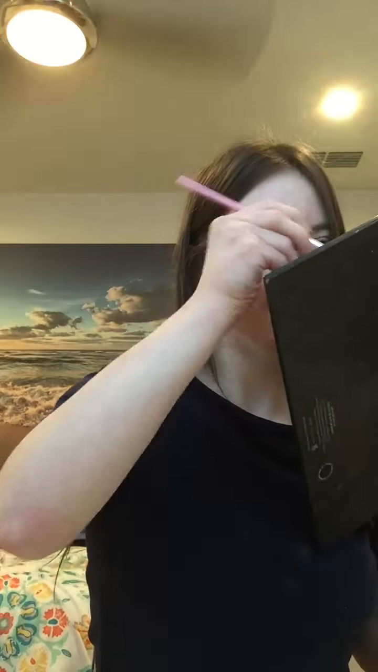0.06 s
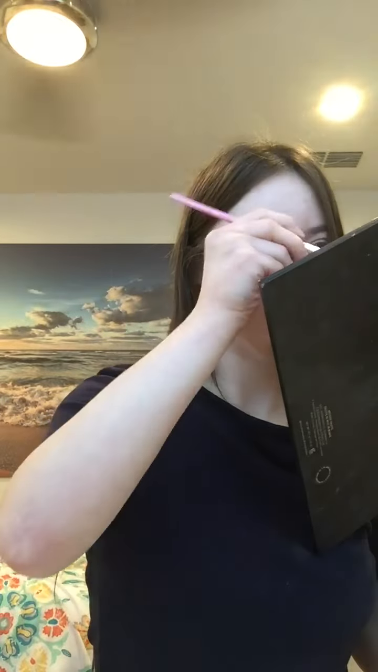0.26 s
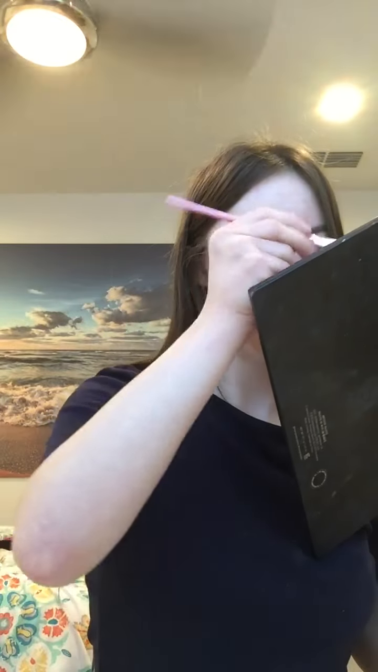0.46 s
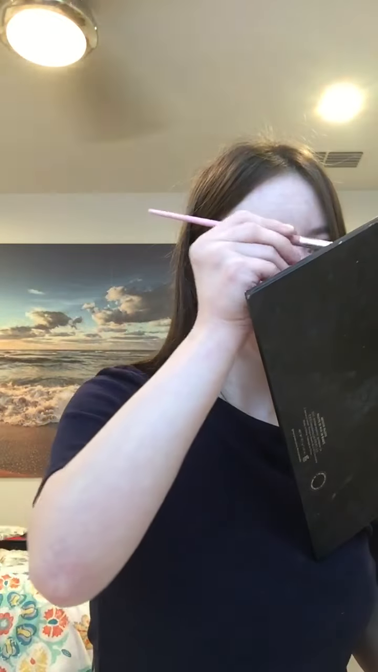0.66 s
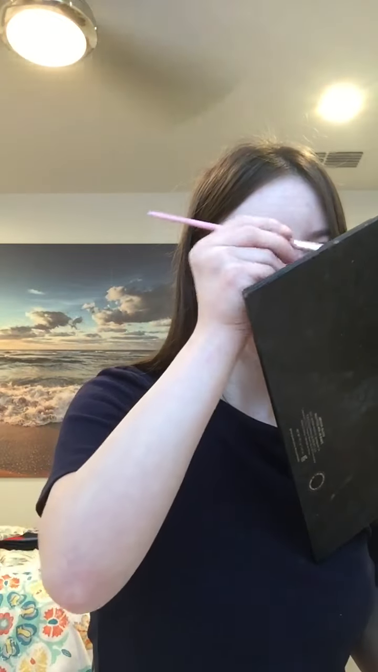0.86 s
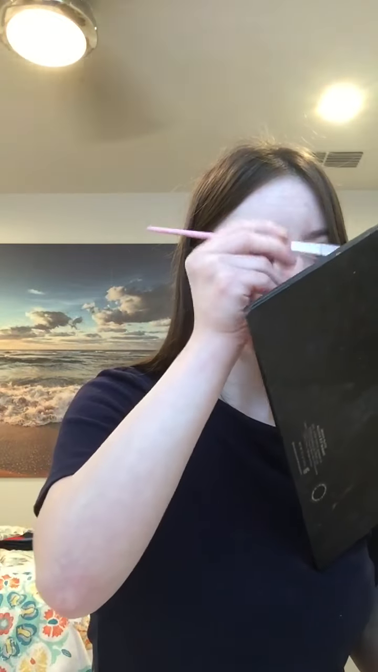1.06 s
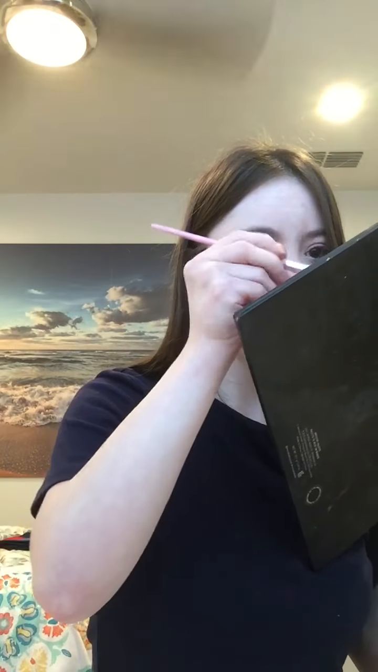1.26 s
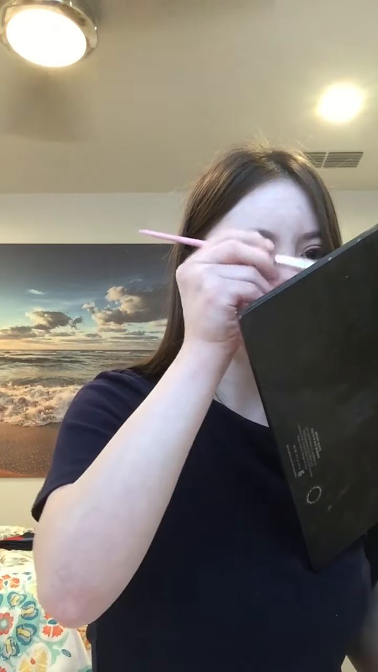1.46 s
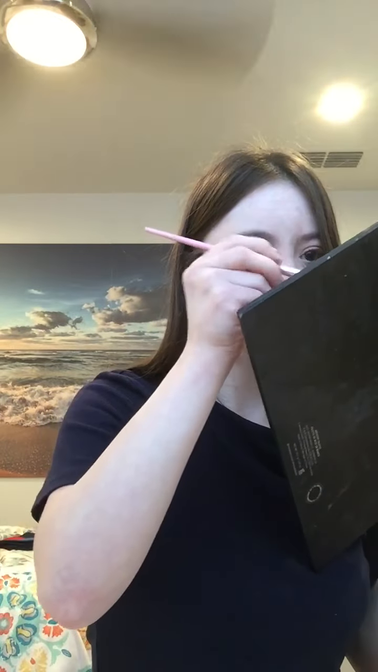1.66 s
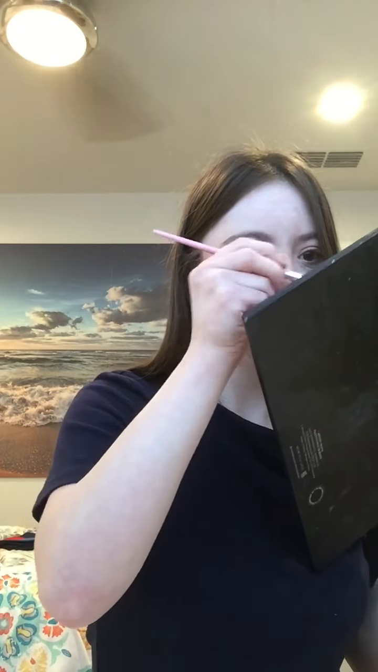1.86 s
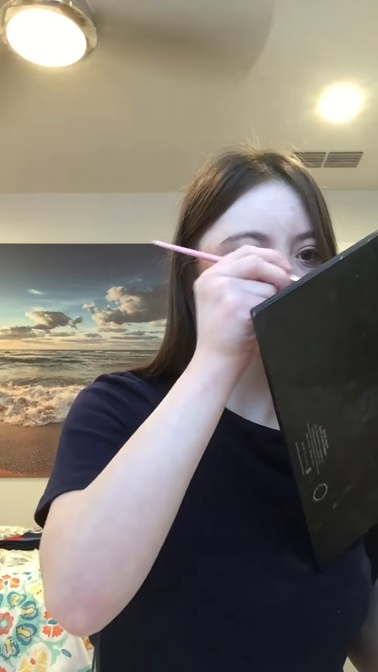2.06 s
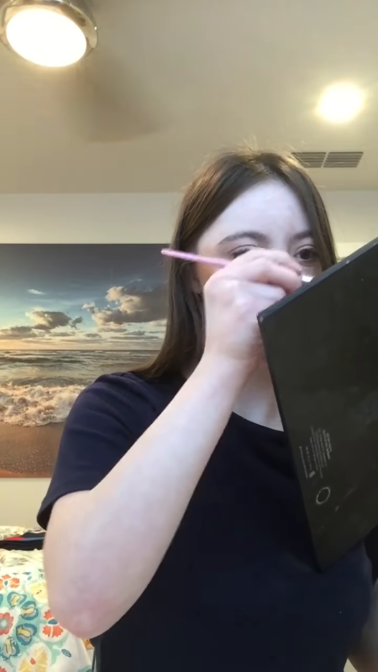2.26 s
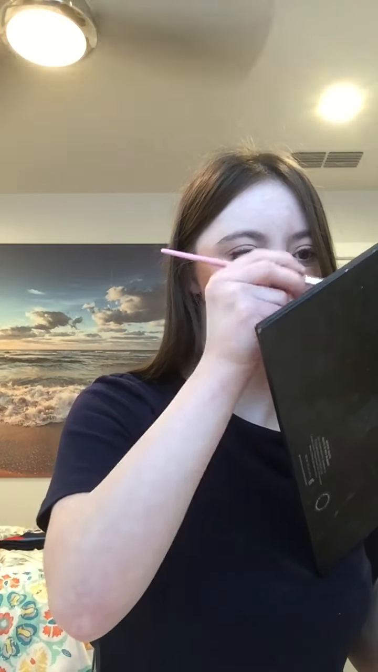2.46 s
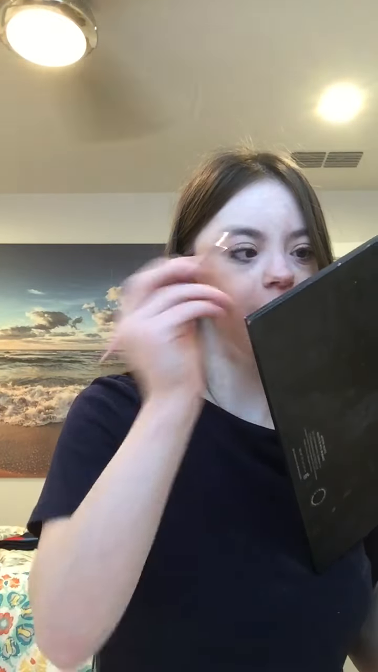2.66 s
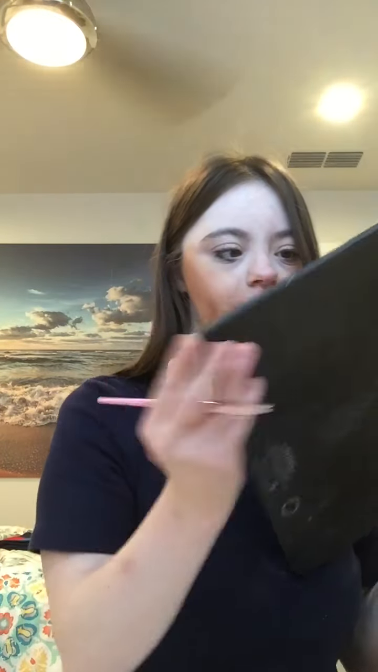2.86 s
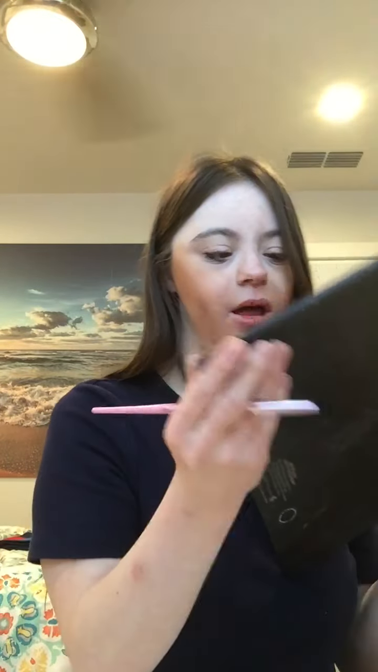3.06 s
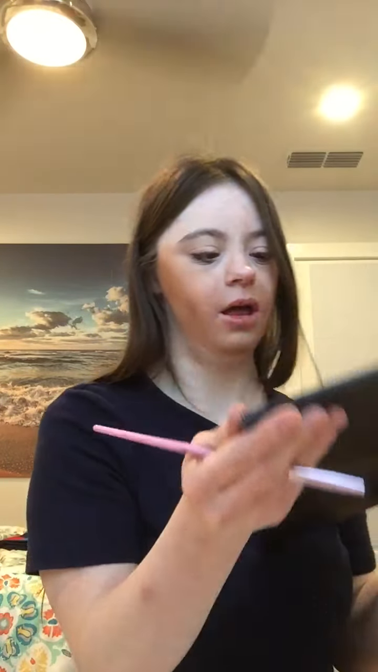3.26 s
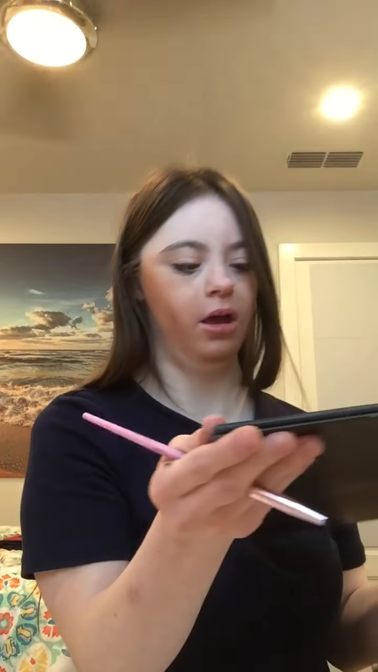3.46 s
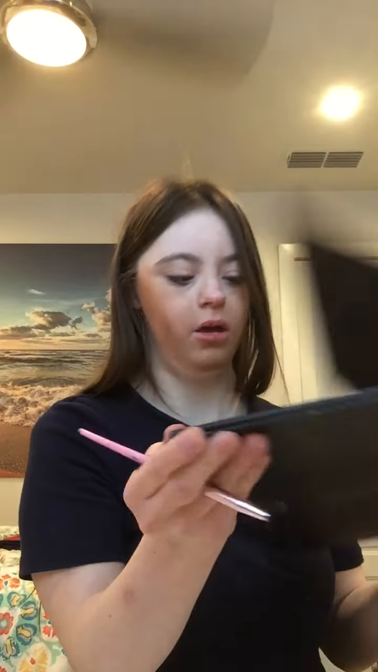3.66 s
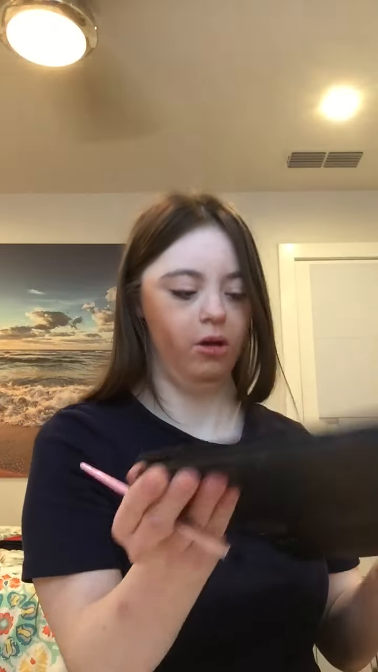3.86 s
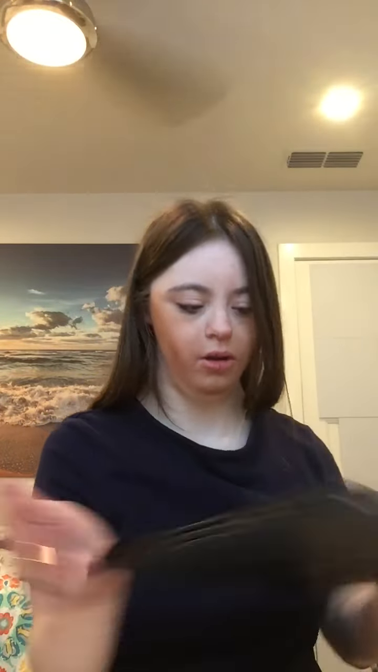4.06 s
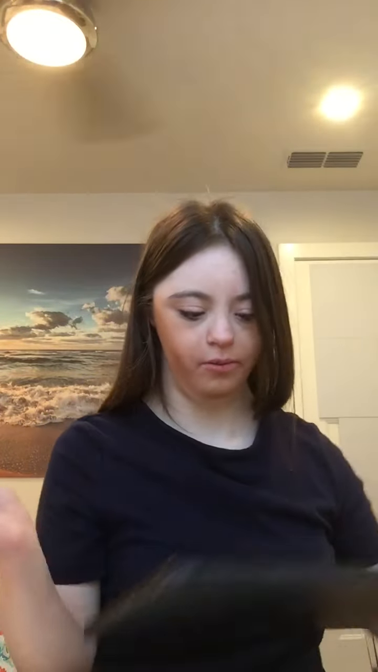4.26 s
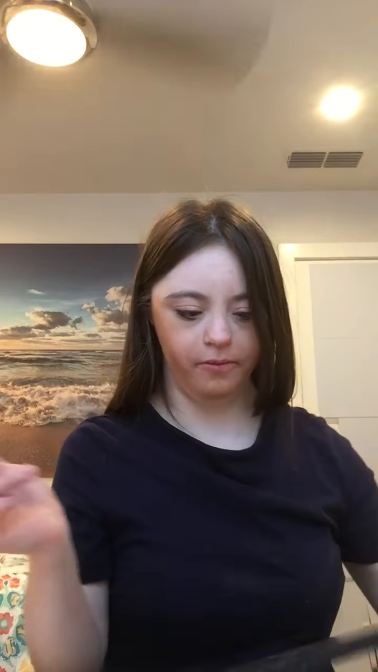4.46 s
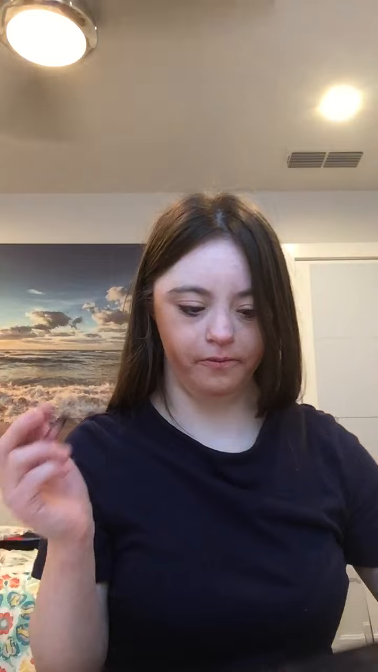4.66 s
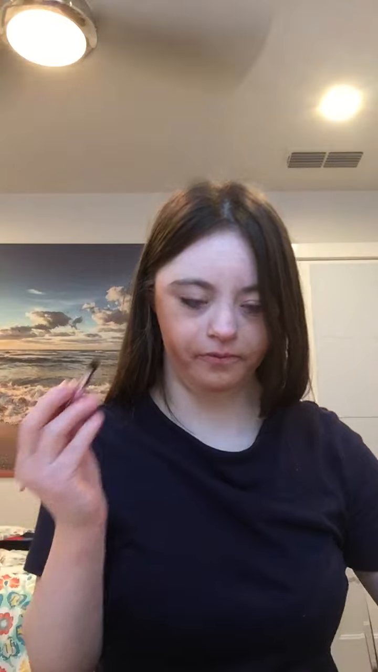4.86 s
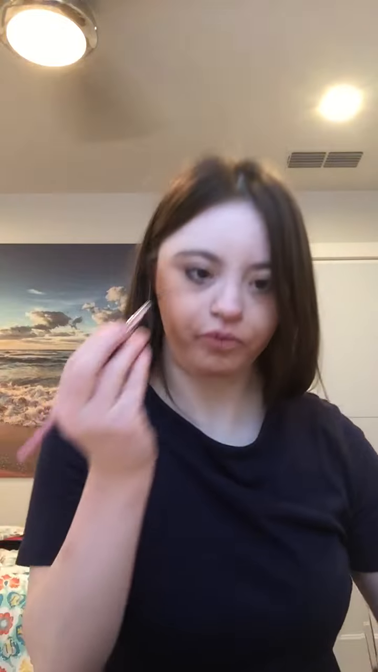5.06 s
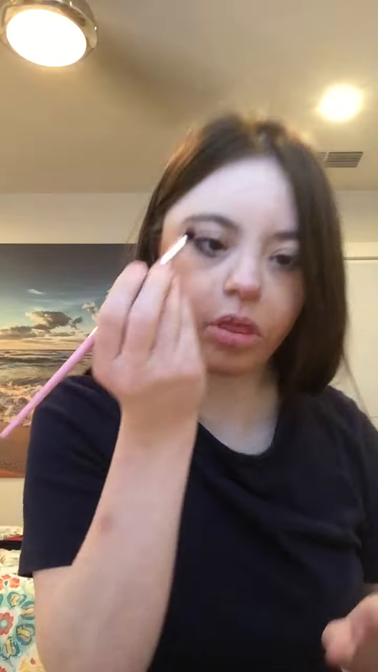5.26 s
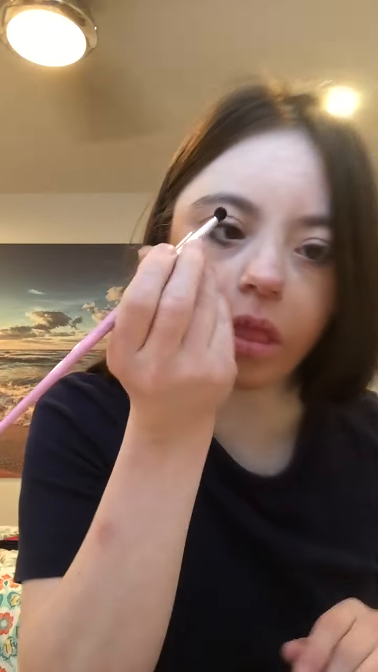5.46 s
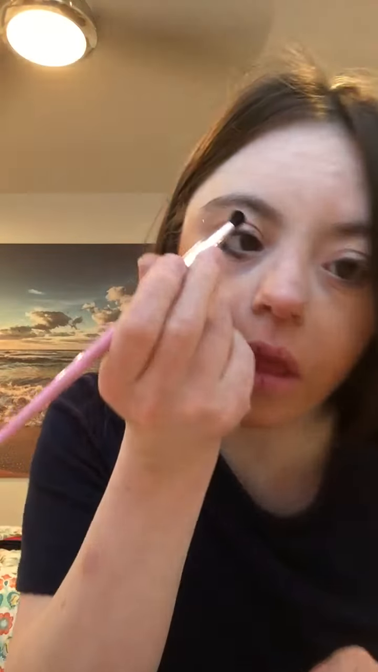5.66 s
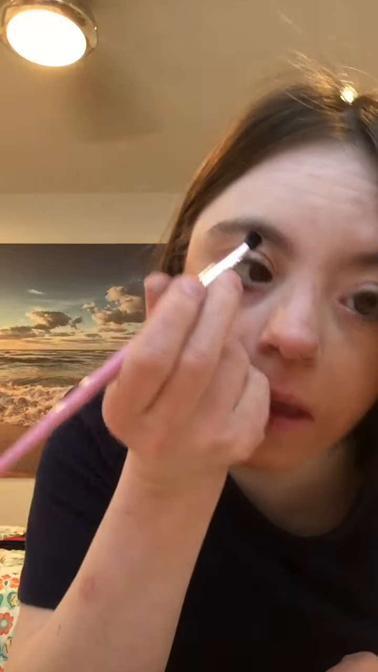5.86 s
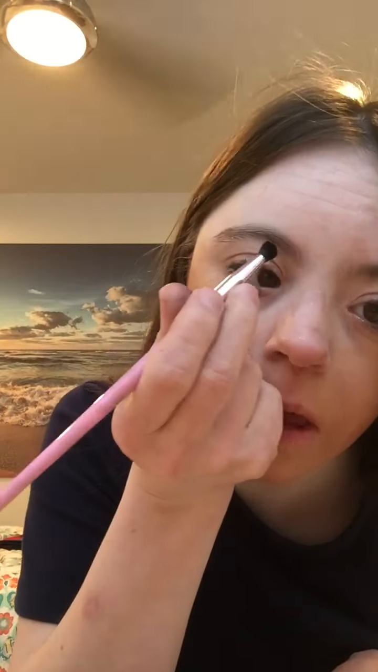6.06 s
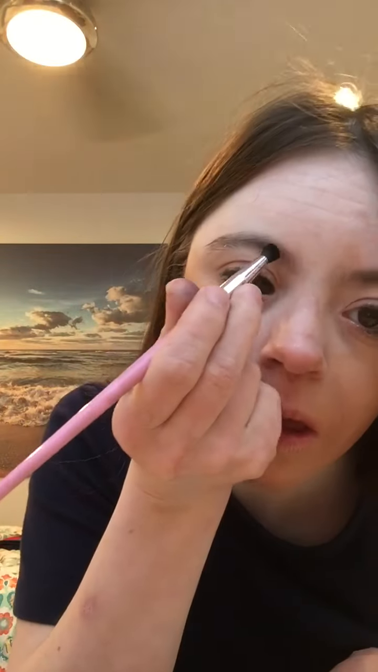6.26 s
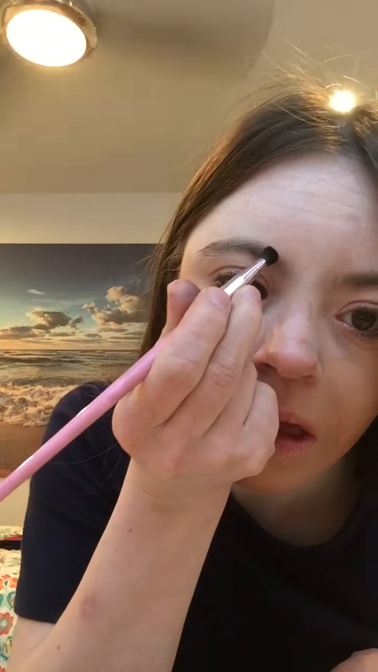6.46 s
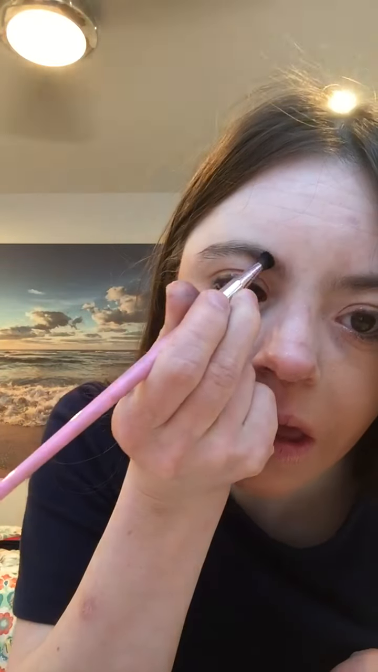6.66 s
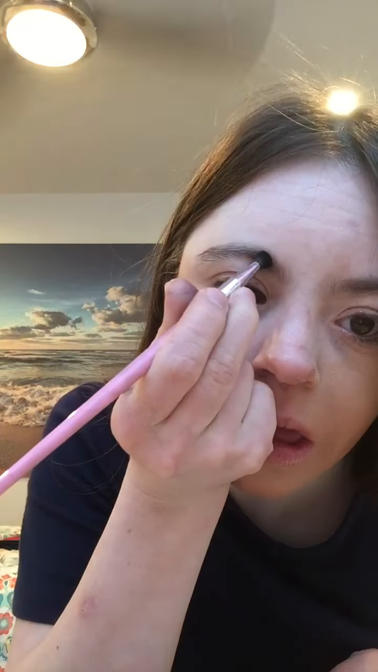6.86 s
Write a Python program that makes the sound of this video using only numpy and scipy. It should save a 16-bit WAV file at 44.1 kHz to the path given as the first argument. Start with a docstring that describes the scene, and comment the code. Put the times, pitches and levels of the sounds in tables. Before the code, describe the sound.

Over a ceiling fan's hum, hands shut a card palette with two clacks, thump it on a table, then a small click follows.

```python
"""A large card makeup palette is clacked shut and put down on a table that carries the microphone.
The lid clacks twice, with a crunch of card and a bright snap; the table thumps under each knock.
Hands slide, fingers and a brush handle tick, and a small hollow click rebounds near the end.
A small bedroom answers, over the mains hum and soft air noise of a ceiling fan."""
import sys
import numpy as np
from scipy import signal
from scipy.fft import rfft, irfft
from scipy.io import wavfile
from scipy.ndimage import uniform_filter1d

SR = 44100
rng = np.random.default_rng(int(sys.argv[2]) if len(sys.argv) > 2 else 0)


def master_out(mix):
    """Clip the mix to full scale and print it as 16-bit PCM to the path in sys.argv[1]."""
    frames = np.transpose(np.atleast_2d(mix))
    ceiling = np.clip(frames, -1, 1)
    pcm = np.round(ceiling * 32767).astype(np.int16)
    wavfile.write(sys.argv[1], SR, pcm)


N = 304376
T = np.arange(N) / SR


def undb(db):
    """Decibels to gain."""
    return 10 ** (np.asarray(db) / 20)


def unit_rms(x):
    """Scale to rms 1."""
    return x / np.sqrt(np.mean(x ** 2))


def curve_at(points, hz):
    """Read (Hz, value) points on a log-frequency axis."""
    points_hz, values = np.transpose(points)
    return np.interp(np.log(np.maximum(hz, 1)), np.log(points_hz), values)


def colour(x, spectrum, size=8192):
    """Minimum-phase filter with a (Hz, dB) spectrum."""
    gain = undb(curve_at(spectrum, np.fft.rfftfreq(size, 1 / SR)))
    cepstrum = irfft(np.log(gain))
    cepstrum[1:size // 2] *= 2
    cepstrum[size // 2 + 1:] = 0
    return signal.fftconvolve(x, irfft(np.exp(rfft(cepstrum))))[:len(x)]


def butter(x, hz, kind, order=2):
    """Butterworth filter."""
    sos = signal.butter(order, np.minimum(hz, SR / 2 - 100), kind, fs=SR, output="sos")
    return signal.sosfilt(sos, x)


def decay(t60_s):
    """A quarter second of exponential decay."""
    return np.exp(-np.log(1000) * T[:SR // 4] / t60_s)


def ring(hz, t60_s):
    """One struck mode."""
    return np.sin(2 * np.pi * hz * T[:SR // 4]) * decay(t60_s)


def burst(t60_s):
    """Dying noise of unit energy and even spectrum, like a dense cluster of tiny impacts."""
    envelope = decay(t60_s)
    x = rng.standard_normal(len(envelope)) * envelope
    for _ in range(4):
        whitened = irfft(np.exp(1j * np.angle(rfft(x))), len(envelope))
        x = whitened * envelope ** 0.25
    return x / np.linalg.norm(x)


def resonance(hz, t60_s, edge_ratio):
    """A dying burst in a narrow band around hz."""
    return butter(burst(t60_s), [hz / edge_ratio, hz * edge_ratio], "band")


def wander(rate_hz):
    """Smooth random curve of rms 1."""
    hold = int(SR / rate_hz)
    steps = np.repeat(rng.standard_normal(N // hold + 1), hold)
    return unit_rms(uniform_filter1d(steps, hold)[:N])


def mottle(x, depth_db):
    """Each narrow band swells and fades on its own over tens of milliseconds."""
    cells = signal.stft(x, SR, nperseg=256)[2]
    patches = uniform_filter1d(rng.standard_normal(cells.shape), size=9, axis=1)
    patches = uniform_filter1d(patches, size=3, axis=0)
    gain = unit_rms(undb(depth_db * unit_rms(patches)))
    return signal.istft(cells * gain, SR)[1][:len(x)]


def add(track, start_s, x):
    """Mix x into the track at start_s."""
    i = int(start_s * SR)
    track[i:i + len(x)] += x[:N - i]


# Reflection spectrum. Each row: frequency in Hz, gain in dB.
ROOM_SPECTRUM = [(60, -8.5), (140, -11.5), (300, 1.5), (700, 2), (1600, -4), (4000, 0), (7000, -3),
                 (15000, -5)]
# Room decay. Each row: frequency in Hz, t60 in seconds.
ROOM_DECAY = [(100, 0.47), (500, 0.22), (1500, 0.26), (4000, 0.19), (12000, 0.18)]

def in_room(x, wet_db, gap_s=0.0015, build_s=0.011):
    """Direct sound plus dense small-room reflections, new for each call; the treble dies first."""
    t = T[:SR // 2]
    hz, age_s, cells = signal.stft(rng.standard_normal(len(t)), SR, nperseg=256)
    decay_db = -60 * age_s / curve_at(ROOM_DECAY, hz)[:, None]
    tail = signal.istft(cells * undb(decay_db), SR)[1][:len(t)]
    tail *= np.clip((t - gap_s) / build_s, 0, 1)
    response = undb(wet_db) * colour(tail / np.linalg.norm(tail), ROOM_SPECTRUM)
    response[0] += 1
    return signal.fftconvolve(x, response)[:N]


# Motor hum. Each row: harmonic number, rms level in dB.
HUM_HARMONICS = [(1, -48.5), (2, -59.5), (3, -60)]
# Fan air and microphone hiss. Each row: frequency in Hz, relative level in dB.
AIR_SPECTRUM = [(20, -23), (45, -10.5), (82, -0.5), (105, -4), (210, 0), (270, -5.5), (370, -3),
                (420, -15.5), (510, -20), (1000, -26), (2200, -31), (5000, -36.5), (11000, -42),
                (15500, -41.5)]

def fan(hum_hz=120, waver_db=0.965, air_db=-54.5):
    """The motor hums at twice the mains rate, its overtones wavering more; the air noise is steady."""
    hum = np.zeros(N)
    for harmonic, db in HUM_HARMONICS:
        amplitude = np.sqrt(2) * undb(db + waver_db * harmonic * wander(7.3))
        hum += amplitude * np.sin(2 * np.pi * (harmonic * hum_hz * T + rng.random()))
    air = unit_rms(colour(rng.standard_normal(N), AIR_SPECTRUM))
    return hum + undb(air_db) * air


# Rub before its tilt, and skin hiss. Each row: frequency in Hz, relative level in dB.
RUB_SPECTRUM = [(400, -8), (750, 7.5), (1400, 2.5), (2400, -3.5), (3500, -1.5), (5000, 0), (7000, -10.5),
                (10000, -17)]
HISS_SPECTRUM = [(3000, -3), (6000, -14), (8500, 1.5), (10500, 0), (13500, 5.5), (15500, -1), (16500, -12)]
# Hands and palette slide on card, cloth and table.
# Each row: peak time in seconds, fade time in seconds, level in dB, pressure from 0 to 1.
SLIDE_STROKES = [(1.05, 0.2, -78, 0.3), (2.074, .025, -65, 0.5), (2.79, 0.042, -60.5, 0.34),
                 (2.901, 0.15, -66.5, 0.25), (3.008, .025, -60, 0), (3.095, 0.088, -63.5, .24),
                 (3.328, 0.013, -69, 0), (3.394, 0.061, -69, 0.24), (3.681, 0.16, -61, 0.1),
                 (3.919, 0.12, -62, 0.28), (4.057, 0.042, -64, 0.03), (4.145, 0.053, -63, 0.17),
                 (4.48, 0.27, -70.5, 0.3), (4.699, 0.048, -57.5, 1), (4.787, 0.14, -63.5, 0.8),
                 (4.997, 0.052, -60.5, .6), (5.557, 0.057, -65, 0.91), (6.179, 0.098, -69.5, 0.63)]

def slides(grain_db=1.0, catch_db=0.56, rise_ratio=0.71):
    """Skin drags in tiny uneven slips; pressure trades hiss for rub and darkens the rub."""
    slips = undb(grain_db * wander(450) + catch_db * wander(35))
    from_peak_s = T[:int(SR * 0.8)] - 0.4
    out = np.zeros(N)
    for peak_s, fade_s, db, pressure in SLIDE_STROKES:
        width_s = fade_s * np.where(from_peak_s < 0, rise_ratio, 1)
        swell = np.exp(-(from_peak_s / width_s) ** 2)
        tilt_db_per_octave = 7 - 10 * pressure
        tilted = [(hz, rub_db + tilt_db_per_octave * np.log2(hz)) for hz, rub_db in RUB_SPECTRUM]
        rub = unit_rms(colour(rng.standard_normal(len(swell)), tilted))
        hiss = unit_rms(colour(rng.standard_normal(len(swell)), HISS_SPECTRUM))
        balance = undb(-4 + 14 * pressure)
        add(out, peak_s + from_peak_s[0], undb(db) * swell * (rub * balance + hiss / balance))
    return mottle(out * unit_rms(slips), depth_db=3)


# Contact snap, shared by taps, clicks, knocks and lid. Each row: frequency in Hz, gain in dB.
SNAP_SPECTRUM = [(300, -53), (1200, 15), (4000, -2.5), (5200, -5), (9000, -6), (13500, -5), (16000, -7)]

def tap(hz, t60_s, snap_db):
    """A light touch rings two bending modes of a thin stiff part; a longer one starts softly."""
    fundamental = resonance(hz, t60_s, edge_ratio=1.12)
    overtone = resonance(min(3.3 * hz, 14000), t60_s, edge_ratio=1.12)
    snap = colour(burst(t60_s), SNAP_SPECTRUM)
    onset = np.minimum(T[:SR // 4] / (0.12 * t60_s), 1)
    return onset * (19 * fundamental + 0.7 * overtone + undb(snap_db) * snap)


# Light touches. Each row: start in seconds, level in dB, centre in Hz, t60 in seconds.
TOUCHES = [(2.054, -41, 3480, 0.039), (2.123, -54, 4070, 0.027), (2.774, -41.5, 3580, 0.065),
           (2.939, -39.5, 1390, 0.017), (2.945, -35, 630, .06), (3.084, -36, 2030, 0.063),
           (4.065, -46.5, 3080, 0.018), (4.662, -22, 4960, 0.026), (4.913, -40.5, 2570, 0.018),
           (5.37, -44, 1454, 0.019), (5.646, -50.5, 8300, 0.02), (5.984, -49.5, 7300, 0.03)]

def ticks():
    """Single taps and scuffs of fingers and brush handle."""
    out = np.zeros(N)
    for start_s, db, hz, t60_s in TOUCHES:
        add(out, start_s, undb(db) * tap(hz, t60_s, snap_db=6))
    return out


def grip(start_s=3.014, length_s=0.17, slips_per_s=27, jitter_s=0.0024, scatter_db=2, fade_db_per_s=20):
    """Fingers shift their grip, sticking and slipping on the lid in a short uneven run."""
    out = np.zeros(N)
    for age_s in np.arange(0, length_s, 1 / slips_per_s):
        slip_s = start_s + age_s + rng.normal(0, jitter_s)
        db = rng.normal(-36, scatter_db) - fade_db_per_s * age_s
        add(out, slip_s, undb(db) * tap(hz=2130, t60_s=0.072, snap_db=0))
    return out


# A click and its rebound. Each row: start in seconds, level in dB.
CLICK_HITS = [(6.2272, 0.5), (6.2490, -5)]
# Cavity modes. Each row: centre in Hz, level in dB, t60 in seconds, ratio of band edge to centre.
HOLLOW_MODES = [(1510, -2, 0.022, 1.094), (1920, -6, 0.37, 1.035), (3960, -10.5, .06, 1.08),
                (6350, -20.5, 0.034, 1.06)]

def clicks(snap_db=-25):
    """A sharp snap rings a small hollow; one resonance lingers."""
    out = np.zeros(N)
    for start_s, db in CLICK_HITS:
        hollow = sum(undb(mode_db) * resonance(hz, t60_s, edge_ratio)
                     for hz, mode_db, t60_s, edge_ratio in HOLLOW_MODES)
        snap = colour(burst(0.025), SNAP_SPECTRUM)
        add(out, start_s, undb(db) * (hollow + undb(snap_db) * snap))
    return out


# Palette modes. Each row: frequency in Hz, relative level in dB, t60 in seconds before damping.
PALETTE_MODES = [(240, -9, .04), (382, -7, .035), (580, -1, .03), (705, -2, .035), (1032, -4, .03),
                 (1232, -4, .035), (1375, -1, .045), (1560, -5, .03), (1710, -5, .035), (1950, -1, .035),
                 (2432, -7, .035), (3075, -5, .03), (3322, -4, .03), (3785, -6, .03), (4040, -6, .035),
                 (4420, -6, .025), (6350, -17, .02)]
# Card on card. Each row: frequency in Hz, gain in dB.
CRUNCH_SPECTRUM = [(70, -23), (200, 7.5), (420, 5), (620, 6.5), (870, 2.5), (1400, 1.5), (2000, 2.5),
                   (2600, -4.5), (3400, 2), (4400, 1), (5600, -7.5), (7500, -4), (14000, 9)]

def palette_blow(cutoff_hz, pitch_ratio=1.0, damping=0.66, modes_db=-26, crunch_db=4):
    """A blow rings the palette and crunches the card; a soft contact loses the treble."""
    modes = sum((-1) ** k * undb(db) * ring(hz * pitch_ratio, t60_s * damping)
                for k, (hz, db, t60_s) in enumerate(PALETTE_MODES))
    crunch = colour(burst(0.0308), CRUNCH_SPECTRUM)
    return butter(undb(modes_db) * modes + undb(crunch_db) * crunch, cutoff_hz, "low")


# Low table modes. Each row: base frequency in Hz, level in dB, ring time ratio.
TABLE_MODES = [(90, -13, 1.1), (132, 1, 1.0), (208, -8, .7), (268, -8, .8), (335, -9, .75)]
# Table-top clunk. Each row: centre in Hz, t60 in seconds, level in dB for a 0 dB blow.
CLUNK_MODES = [(680, 0.077, 12), (1040, 0.04, 7.5)]

def table_thump(blow_db, push_s, pitch_ratio, clunk_db_per_db=0.27):
    """A half-sine push rings the table; a heavier blow damps it sooner and adds more clunk."""
    push = np.sin(np.pi * np.minimum(T[:SR // 50] / push_s, 1))
    ring_s = 0.093 / (1 + 0.74 * undb(blow_db))
    modes = sum(undb(db) * ring(hz * pitch_ratio, ratio * ring_s) for hz, db, ratio in TABLE_MODES)
    thump = signal.fftconvolve(modes, push / push.sum())[:len(modes)]
    clunk = sum(undb(db + clunk_db_per_db * blow_db) * resonance(hz, t60_s, edge_ratio=1.35)
                for hz, t60_s, db in CLUNK_MODES)
    return undb(blow_db) * (butter(thump, 81, "high", order=3) + clunk)


# Palette bumps and knocks. Each row: start in seconds, thump level in dB, push time in seconds,
# table pitch ratio, contact level in dB, contact cutoff in Hz, relative snap level in dB.
PALETTE_KNOCKS = [(2.9394, -30, 0.0019, 1.6, -17, 800, -30), (4.4209, -7.5, 0.0018, 1.03, 3.5, 800, -28.5),
                  (4.5165, -18, 0.0021, 1.06, -14.5, 756, -38), (4.6604, -7, 0.0016, 0.9, 1, 2180, -32),
                  (4.6821, -10.5, 0.0023, .97, -1.5, 1180, -33),
                  (4.8467, -31.5, 0.0017, 1.37, -21.5, 4930, -25),
                  (5.0340, -20.5, 0.0045, 0.78, -32, 1500, -18),
                  (5.0897, 0.5, 0.0038, 1.06, 2.5, 1760, -14.5),
                  (5.3675, -39.5, 0.0017, 1.62, -25.5, 1400, -32)]

def knocks(weight_lag_s=0.0019, settle_s=0.003, rattle_db=-5):
    """The palette's edge snaps down, its weight thumps the table, and it settles; its pans rattle."""
    out = np.zeros(N)
    for start_s, thump_db, push_s, pitch_ratio, contact_db, cutoff_hz, snap_db in PALETTE_KNOCKS:
        thump = table_thump(thump_db, push_s, pitch_ratio)
        add(out, start_s + weight_lag_s, in_room(thump, wet_db=-12.5))
        for lag_s, edge_db, brightness in ((0, -4, 1), (settle_s, 0, 0.72)):
            snap = colour(burst(0.0095) + undb(rattle_db) * burst(0.1), SNAP_SPECTRUM)
            contact = palette_blow(cutoff_hz * brightness) + undb(snap_db) * snap
            add(out, start_s + lag_s, undb(contact_db + edge_db) * in_room(contact, wet_db=-9.5))
    return out


# Lid meets tray. Each row: start in seconds, level in dB, contact cutoff in Hz, relative snap level
# in dB, palette pitch ratio, relative flex level in dB, low cut in Hz.
LID_CLACKS = [(3.7886, 0, 4900, -14.5, 0.924, -26, 80), (3.8978, -1.5, 4340, -1, 1.03, -38, 442)]

def lid(second_edge_s=0.003):
    """The lid snaps down on one edge, then softer and duller on the other; the wide panel flexes."""
    out = np.zeros(N)
    flex = butter(ring(139, 0.13) + 0.54 * ring(213, 0.067), 74, "high", order=4)
    for start_s, db, cutoff_hz, snap_db, pitch_ratio, flex_db, low_cut_hz in LID_CLACKS:
        for lag_s, edge_db, brightness in ((0, 0, 1), (second_edge_s, -2.5, 0.64)):
            snap = brightness * colour(burst(0.0162), SNAP_SPECTRUM)
            body = butter(palette_blow(cutoff_hz * brightness, pitch_ratio), low_cut_hz, "high")
            clack = body + undb(snap_db) * snap + undb(flex_db) * flex
            add(out, start_s + lag_s, undb(db + edge_db) * in_room(clack, wet_db=-3.5))
    return out


def scene():
    """Close handling sounds over the fan, in mono."""
    mix = lid() + knocks() + in_room(ticks() + grip() + clicks(), wet_db=-3) + slides() + fan()
    return mix[None]


def record(dry):
    """Steep low-pass at 16 kHz."""
    return signal.sosfilt(signal.ellip(10, 0.2, 80, 16000, fs=SR, output="sos"), dry)


dry = scene()
out = record(dry)
master_out(out)
```